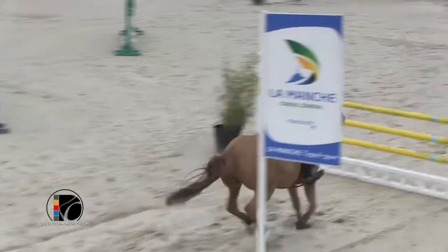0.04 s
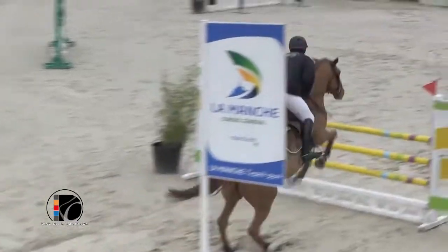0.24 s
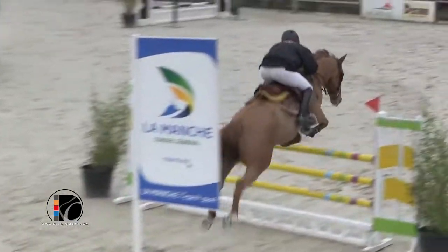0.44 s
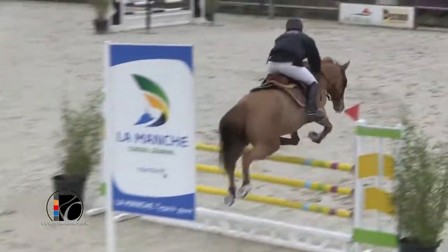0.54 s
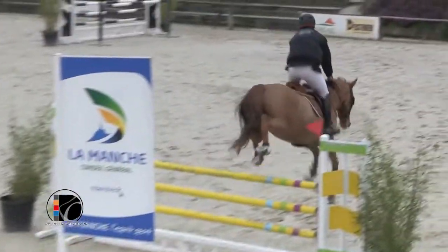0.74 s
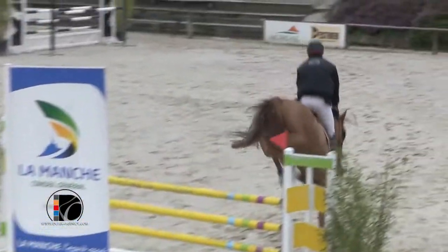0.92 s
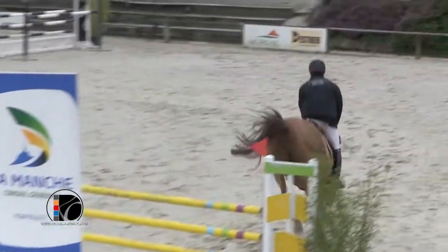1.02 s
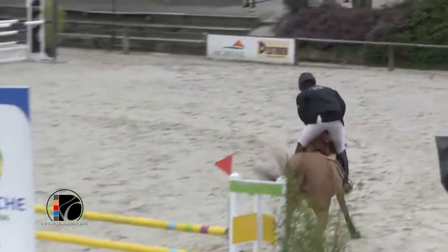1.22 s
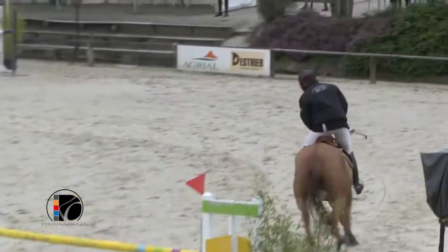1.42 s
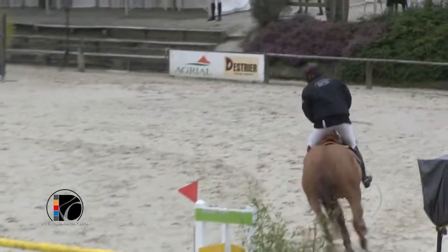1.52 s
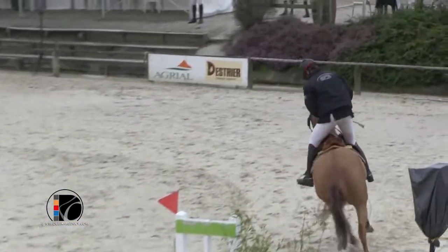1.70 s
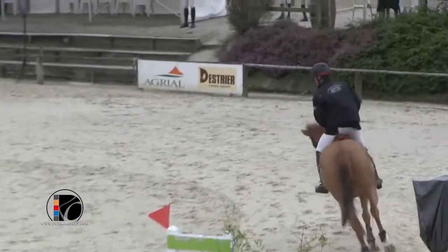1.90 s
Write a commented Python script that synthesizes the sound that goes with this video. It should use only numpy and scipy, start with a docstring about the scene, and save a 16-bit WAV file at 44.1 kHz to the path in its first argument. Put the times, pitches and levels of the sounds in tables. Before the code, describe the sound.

A horse jumps a fence, its hooves thudding in sand and sharply knocking wood once.

```python
"""In a sand arena a horse takes off over a fence: its hooves thud, one knocks sharply and woodenly,
sand flies and patters, then it lands and canters away. Each impact excites damped vibrations
and a dying shower of grain noise. The stands echo faintly; small birds whistle in gliding tones
over a quiet outdoor rumble."""
import sys
import numpy as np
from scipy import signal
from scipy.fft import rfft, irfft, next_fast_len
from scipy.io import wavfile
from scipy.ndimage import uniform_filter1d

SR = 44100
rng = np.random.default_rng(int(sys.argv[2]) if len(sys.argv) > 2 else 0)


def dump_mix(stems):
    """Bounce the given channels to the path in sys.argv[1] as a 16-bit WAV at rate SR."""
    frames = np.atleast_2d(stems).T  # one column per channel
    limited = np.clip(frames, -1, 1)  # hard clip at full scale
    pcm = np.round(limited * 32767).astype(np.int16)
    wavfile.write(sys.argv[1], SR, pcm)


N = 85995
T = np.arange(N) / SR


def amp(db):
    """Amplitude ratio of a level in decibels."""
    return 10 ** (np.asarray(db) / 20)


def unit(x):
    """Normalisation to unit rms."""
    return x / np.sqrt(np.mean(x ** 2) + 1e-20)


def along(points, hz):
    """Interpolation of (f/Hz, value) points on a logarithmic frequency axis."""
    f, value = np.transpose(points)
    return np.interp(np.log(hz + 1), np.log(f + 1), value)


def envelope(points):
    """Amplitude envelope through (t/s, level/dB) points."""
    return amp(np.interp(T, *np.transpose(points)))


def decay(t, t60):
    """Exponential damping: 60 dB down after t60 seconds."""
    return np.exp(-np.log(1000) * t / np.maximum(t60, 1e-3))


def add(track, onset, sound):
    """Superposition of a sound on a track, from its onset in seconds."""
    part = track[..., max(round(onset * SR), 0):][..., :sound.shape[-1]]
    part += sound[..., :part.shape[-1]]


def colour(x, spectrum):
    """Minimum-phase filter through (f/Hz, gain/dB) points: folding the cepstrum makes it causal."""
    n = x.shape[-1]
    m = 2 * next_fast_len(n)
    gain = amp(along(spectrum, np.fft.rfftfreq(m, 1 / SR)))
    cepstrum = irfft(np.log(gain))
    cepstrum[1:m // 2] *= 2
    cepstrum[m // 2 + 1:] = 0
    return irfft(rfft(x, m) * np.exp(rfft(cepstrum)), m)[..., :n]


def stereo(pair, coherence):
    """Mid-side mixing: two independent signals become a partly coherent left and right."""
    n = pair.shape[-1]
    likeness = np.clip(along(coherence, np.fft.rfftfreq(n, 1 / SR)), 0, 1)
    angle = np.arccos(likeness) / 2
    mid, side = irfft(rfft(pair) * [np.cos(angle), np.sin(angle)], n)
    return np.array([mid + side, mid - side])


# Left-right coherence of the diffuse field: f/Hz, coherence/1
DIFFUSE_COHERENCE = [(60, 1), (500, 0.96), (1000, 0.83), (2000, 0.43), (6000, 0.087), (14000, 0.31)]
# Spectrum of the rumble: f/Hz, gain/dB
RUMBLE_SPECTRUM = [(12, -52), (20, -21), (38, -6.5), (104, 2), (248, 0), (319, -3.5), (485, -2.5),
                   (1090, -9.5), (1400, -17.5), (2020, -15), (3250, -23.5), (12400, -42.5), (16000, -54)]
# Envelope of the rumble: t/s, level/dB
RUMBLE_LEVEL = [(0, -46.5), (.45, -46), (.66, -49), (.9, -49), (1.15, -47), (1.5, -51), (1.95, -50.5)]
# Soft low swells: t/s, duration/s, f/Hz, level/dB
LOW_SWELLS = [(0.727, 0.24, 79.4, -52.5), (1.206, .11, 102.5, -51.5), (1.541, 0.08, 83, -49),
              (1.655, 0.082, 99, -51.5)]
def rumble():
    """Diffuse outdoor noise, coherent at long wavelengths, with a few narrow-band swells."""
    noise = colour(rng.standard_normal((2, N)), RUMBLE_SPECTRUM)
    out = envelope(RUMBLE_LEVEL) * unit(stereo(noise, DIFFUSE_COHERENCE))
    for onset, duration, hz, db in LOW_SWELLS:
        arch = np.sin(np.pi * np.clip((T - onset) / duration, 0, 1))
        band = [(hz / 2, -30), (hz, 0), (hz * 2, -30), (hz * 10, -100)]
        swell = arch * colour(rng.standard_normal(N), band)
        out += amp(db) * unit(swell) * np.sqrt(duration * SR / N)
    return out


# Reverberation time of the stands: f/Hz, T60/s
STANDS_T60 = [(100, 0.98), (600, 0.66), (2000, 0.39), (6000, 0.14), (14000, 0.3)]
# Spectrum of the reflections: f/Hz, gain/dB
ECHO_SPECTRUM = [(60, -21), (180, 0), (900, -2.5), (2200, 1), (6000, -0.5), (15000, -11)]
def reverberation(x, stands_db=-17, fences_db=-11, fences_t60=0.07, delay_s=0.008):
    """Convolution with an impulse response: early scatter from fences, a longer tail from the stands."""
    hz, t, bands = signal.stft(rng.standard_normal((2, SR)), SR, nperseg=256)
    damped = bands * decay(t, along(STANDS_T60, hz)[:, None])
    stands = signal.istft(damped, SR, nperseg=256)[1][:, :SR]
    fences = rng.standard_normal((2, SR)) * decay(T[:SR], fences_t60)
    reflections = amp(stands_db) * unit(stands) + amp(fences_db) * unit(fences)
    response = stereo(colour(reflections, ECHO_SPECTRUM), DIFFUSE_COHERENCE) / np.sqrt(SR)
    out = np.zeros((2, N))
    add(out, delay_s, signal.fftconvolve(x.mean(axis=0)[None], response, axes=1))
    return out


# Bird whistles: t/s, duration/s, start f/Hz, end f/Hz, level/dB
BIRD_WHISTLES = [(0.46, 0.055, 3910, 3240, -60), (0.632, 0.053, 3870, 3220, -56),
                 (0.664, 0.052, 3350, 2500, -60), (0.8, 0.058, 3940, 3340, -55),
                 (.835, 0.04, 3500, 2550, -58.5), (0.835, 0.072, 2344, 1810, -60),
                 (1.639, .062, 2230, 1675, -54.5), (1.64, 0.066, 2720, 2540, -62),
                 (1.727, 0.062, 3390, 3150, -61), (1.777, 0.18, 2577, 2640, -58.5)]
def birds(waver_depth=0.01, glide_exponent=1.25):
    """Frequency modulation: distant whistles waver at random as they glide, mostly downward."""
    out = np.zeros((2, N))
    for onset, duration, start_hz, end_hz, db in BIRD_WHISTLES:
        progress = np.clip((T - onset) / duration, 0, 1)
        waver = unit(uniform_filter1d(rng.standard_normal(N), size=120))
        glide = start_hz + (end_hz - start_hz) * progress ** glide_exponent
        phase = 2 * np.pi * np.cumsum(glide * (1 + waver_depth * waver)) / SR
        out += amp(db) * np.sin(np.pi * progress) * np.sin(phase)
    return out


def grains(n, spread):
    """Granular noise: two streams of tiny impacts with a log-normal spread of sizes."""
    return rng.standard_normal((2, n)) * np.exp(spread * rng.standard_normal(n))


# Left-right coherence of the direct sound: f/Hz, coherence/1
DIRECT_COHERENCE = [(500, 0.99), (2000, 0.88), (6000, 0.62), (14000, 0.49)]
def burst(spectrum, t60, spread, snap):
    """Impact noise: an impulse of relative size snap, then an exponentially dying shower of grains."""
    t = T[:SR // 5]
    shower = grains(len(t), spread) * decay(t, t60)
    shower /= np.linalg.norm(shower, axis=1, keepdims=True)
    shower[0, 0] += snap
    impact = unit(stereo(colour(shower, spectrum), DIRECT_COHERENCE))
    return impact * np.sqrt(SR / 100 / len(t))  # the energy of 10 ms at unit rms


# Spectrum of falling sand: f/Hz, gain/dB
SAND_SPECTRUM = [(500, 6), (1500, 10.5), (4500, 3), (7000, -1.5), (11000, -7), (16000, -15.5)]
# Envelope of trickling sand: t/s, level/dB
TRICKLE_LEVEL = [(0, -55), (.14, -51.5), (.21, -58), (.32, -60), (.58, -59), (.8, -65), (.97, -67.5),
                 (1.08, -57.5), (1.4, -62.5), (1.62, -64.5), (1.74, -62.5), (1.95, -63)]
# Sprays of thrown sand: t/s, level/dB, T60/s
SAND_SPRAYS = [(0.1046, -43, 0.014), (.268, -43.5, 0.077), (.390, -45.5, 0.075), (0.439, -47, 0.11),
               (.468, -48, 0.045), (0.529, -45, 0.043), (0.6231, -44.5, 0.034), (0.718, -53.5, 0.1),
               (1.2185, -43, 0.015), (1.251, -55.5, 0.014), (1.374, -50.5, 0.11), (1.434, -54.5, 0.17),
               (1.532, -51, 0.21), (1.697, -48.5, 0.16), (1.73, -53.5, .1), (1.788, -55.5, 0.0076),
               (1.875, -49.5, 0.011)]
def sand():
    """Incoherent sum of grain impacts: kicked sand lands in sprays over a thin trickle."""
    trickle = colour(grains(N, spread=0.85), SAND_SPECTRUM)
    out = envelope(TRICKLE_LEVEL) * unit(stereo(trickle, DIRECT_COHERENCE))
    for onset, db, t60 in SAND_SPRAYS:
        add(out, onset, amp(db) * burst(SAND_SPECTRUM, t60, spread=0.45, snap=0.22))
    return out


# Scuffs in the sand: t/s, duration/s, centre f/Hz, level/dB
SAND_SCUFFS = [(1.427, 0.019, 1800, -49.5), (1.476, .02, 1530, -52.5)]
def scuffs(skirt_db=-21):
    """Friction noise: each brief rub is a swell of grains in one broad band."""
    out, t = np.zeros((2, N)), T[:SR // 4]
    for onset, duration, hz, db in SAND_SCUFFS:
        band = [(hz / 10, -60), (hz / 2, skirt_db), (hz, 0), (hz * 2, skirt_db), (hz * 10, -60)]
        rub = unit(stereo(colour(grains(len(t), spread=0.56), band), DIRECT_COHERENCE))
        arch = np.sin(np.pi * np.clip(t / duration, 0, 1))
        add(out, onset, amp(db) * arch * rub)
    return out


def low_cut(x, corner_hz=138):
    """High-pass filter: the hooves, hollow tones and knock lose their deep bass below the corner."""
    return colour(x, [(corner_hz / 4, -36), (corner_hz / 2, -20), (corner_hz, -3), (corner_hz * 2, 0)])


# Hollow tones of some footfalls: t/s, f/Hz, level/dB, T60/s
HOLLOW_MODES = [(.0905, 161, -26, 0.055), (.0905, 1550, -32, 0.043), (.0905, 2875, -33, 0.034),
                (.2355, 952, -33, 0.082), (.2385, 445, -27, 0.078), (.243, 2130, -32.5, 0.052),
                (.996, 271, -32, 0.073), (1.137, 638, -41.5, 0.18), (1.219, 600, -31, 0.05),
                (1.219, 253, -27, 0.046), (1.219, 409, -30.5, 0.059)]
def hollow_tones():
    """Damped resonance: a footfall rings briefly, like a cupped shell."""
    out, t = np.zeros((2, N)), T[:SR // 4]
    for onset, hz, db, t60 in HOLLOW_MODES:
        add(out, onset, amp(db) * decay(t, t60) * np.sin(2 * np.pi * hz * t))
    return out


# Spectrum of the clop: f/Hz, gain/dB
CLOP_SPECTRUM = [(100, -10.5), (230, 4), (450, 0.5), (850, 3), (1400, -5.5), (2300, -15), (4000, -27),
                 (12000, -48)]
# Spectrum of crunching sand: f/Hz, gain/dB
GRIT_SPECTRUM = [(700, -32.5), (2000, 10.5), (3200, 10), (5000, 2.5), (8000, -3.5), (12000, -12),
                 (16000, -18)]
# Hoof contacts: t/s, thud level/dB, clop level/dB, grit level/dB, T60 of clop and grit/s
FOOTFALLS = [(0.030, -44, -40.5, -75, 0.044), (0.084, -33.5, -36.5, -52, 0.049),
             (0.0903, -37, -35, -36, 0.031), (.096, -28.5, -38, -44, 0.038),
             (0.1252, -59, -35, -47.5, 0.023), (.130, -63, -41, -46.5, 0.021),
             (0.2357, -21.5, -31.5, -35, 0.064), (0.243, -63, -33.5, -50, 0.14),
             (.293, -26.5, -23.5, -39.5, 0.039), (0.9961, -54, -34, -40, 0.018),
             (1.0115, -64, -47, -55, 0.039), (1.047, -31, -42.5, -51, 0.022),
             (1.054, -33.5, -42, -49, 0.026), (1.139, -57, -45.5, -52.5, 0.07),
             (1.213, -37, -50, -45, 0.034), (1.2186, -54, -45, -54, 0.028), (1.266, -34, -66, -56.5, 0.055),
             (1.365, -31.5, -45.5, -48.5, 0.091), (1.867, -66, -41.5, -50, 0.084),
             (1.899, -68, -45, -53, 0.082)]
def hooves(thud_hz=160.4, thud_t60=0.037, rise_s=0.0022):
    """Impact excitation: each hoof draws a damped thud from the ground, clops and crunches the sand."""
    out, t = np.zeros((2, N)), T[:SR // 4]
    thud_envelope = 2 * decay(t, thud_t60) * (1 - np.exp(-t / rise_s))
    for onset, thud_db, clop_db, grit_db, t60 in FOOTFALLS:
        hz = thud_hz * np.exp(0.2 * rng.standard_normal())
        add(out, onset, amp(thud_db) * thud_envelope * np.sin(2 * np.pi * hz * t))
        add(out, onset, amp(clop_db) * burst(CLOP_SPECTRUM, t60, spread=0.31, snap=0.58))
        add(out, onset, amp(grit_db) * burst(GRIT_SPECTRUM, t60, spread=0.49, snap=0.49))
    return out


# Modes of the wooden ring: f/Hz, relative level/dB, T60/s
WOOD_MODES = [(124, -26, 0.048), (168, -25, 0.026), (214.5, -9.5, 0.047), (395, -7, 0.011),
              (634, -17, 0.053), (745, -1, 0.016), (1055, -7, 0.017), (1175, -15.5, 0.05),
              (1737, -22.5, 0.068), (2220, -21, 0.051), (3030, -24.5, 0.015), (6300, -44, 0.013),
              (8650, -27.5, 0.014)]
# Spectrum of the contact crack: f/Hz, gain/dB
CRACK_SPECTRUM = [(300, -35), (1200, -9), (2800, -2), (4000, -5.5), (6200, 5.5), (8500, 0), (11000, -7.5),
                  (16000, -32)]
# Touch, full blow and rattle of the knock: t/s, relative level/dB
KNOCK_CONTACTS = [(.2885, -8), (0.2905, 2), (0.299, -25), (.3020, -14)]
def knock(ring_db=-3.5, crack_db=-31.5):
    """Modal superposition: each hard contact of the hoof cracks and excites a short wooden ring."""
    out, t = np.zeros((2, N)), T[:SR // 4]
    for onset, db in KNOCK_CONTACTS:
        ring = sum(amp(mode_db + rng.normal(0, 1)) * np.sin(2 * np.pi * hz * t) * decay(t, t60)
                   for hz, mode_db, t60 in WOOD_MODES)
        crack = burst(CRACK_SPECTRUM, t60=0.0045, spread=0.11, snap=0.63)
        add(out, onset, -amp(db + ring_db) * ring)
        add(out, onset, amp(db + crack_db) * crack)
    return out


def scene(pan_db=0.2, bird_echo_db=4):
    """Superposition of the horse, the birds, their reverberation and the outdoor rumble."""
    horse = low_cut(hooves() + hollow_tones() + knock()) + sand() + scuffs()
    song = birds()
    horse_in_arena = (horse + reverberation(horse)) * amp([[pan_db], [-pan_db]])
    song_in_arena = song + amp(bird_echo_db) * reverberation(song)
    return horse_in_arena + song_in_arena + rumble()


def record(dry, cutoff_hz=15900):
    """Amplitude and band limiting: clipping at full scale, then an ideal low-pass filter."""
    m = next_fast_len(N + SR // 2)
    passband = np.fft.rfftfreq(m, 1 / SR) < cutoff_hz
    return irfft(rfft(np.clip(dry, -1, 1), m) * passband, m)[:, :N]


dry = scene()
out = record(dry)
dump_mix(out)
```